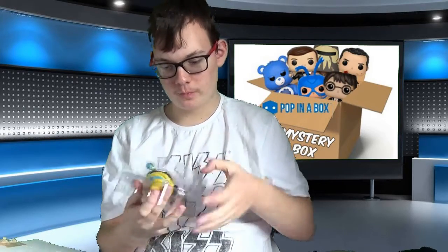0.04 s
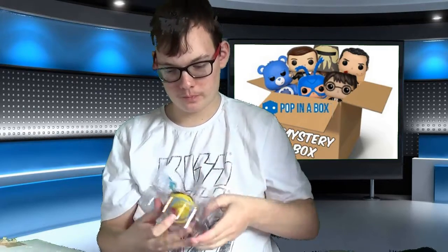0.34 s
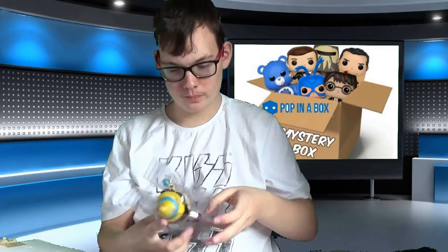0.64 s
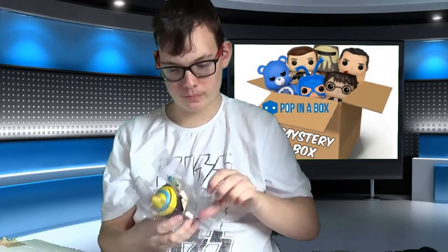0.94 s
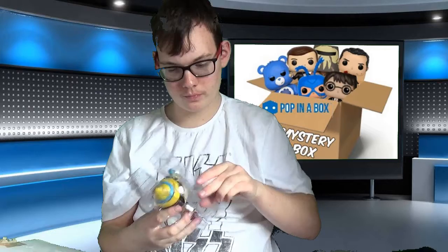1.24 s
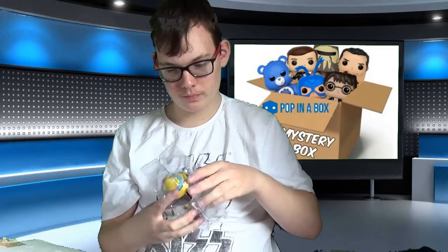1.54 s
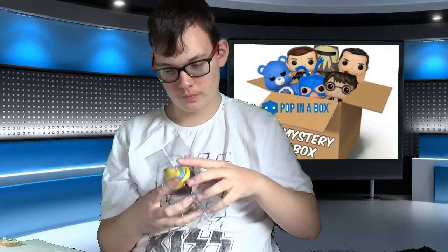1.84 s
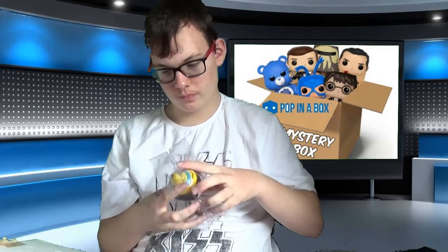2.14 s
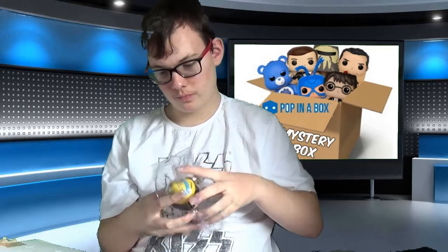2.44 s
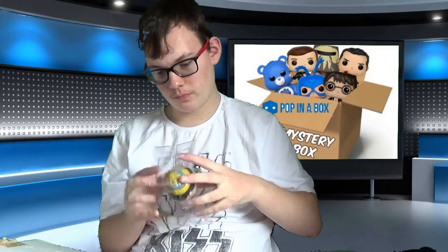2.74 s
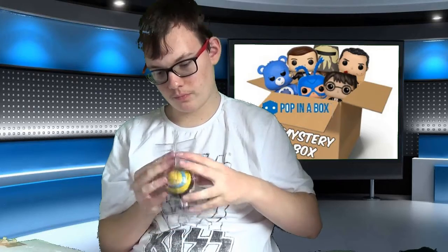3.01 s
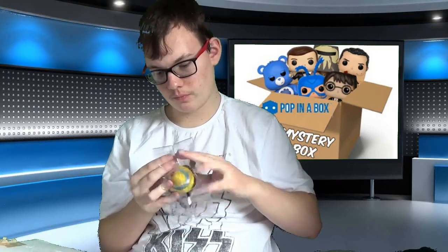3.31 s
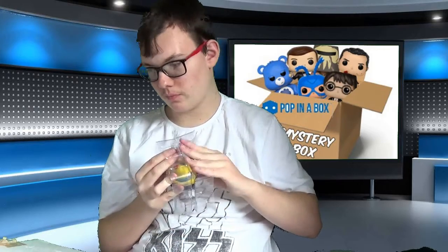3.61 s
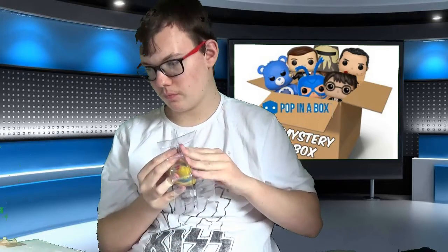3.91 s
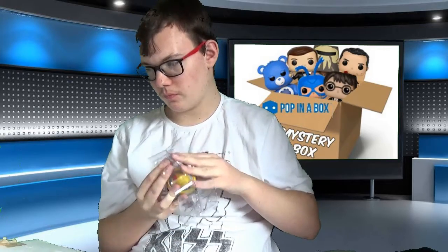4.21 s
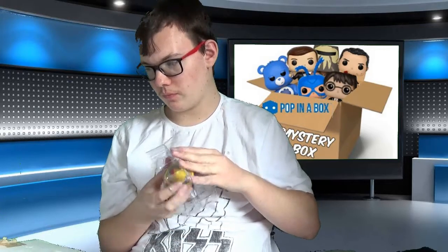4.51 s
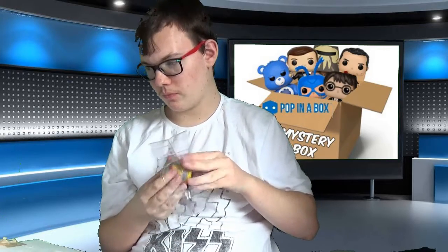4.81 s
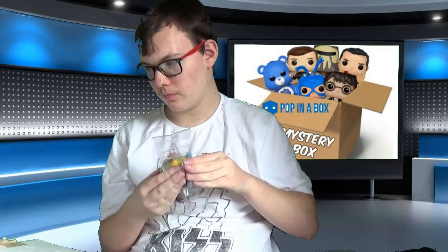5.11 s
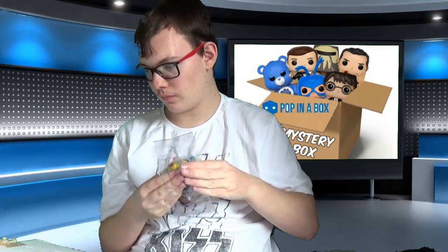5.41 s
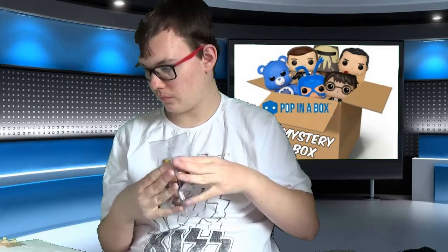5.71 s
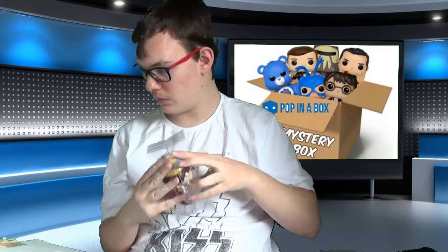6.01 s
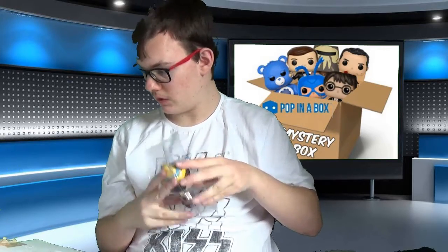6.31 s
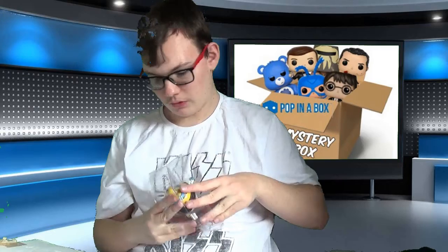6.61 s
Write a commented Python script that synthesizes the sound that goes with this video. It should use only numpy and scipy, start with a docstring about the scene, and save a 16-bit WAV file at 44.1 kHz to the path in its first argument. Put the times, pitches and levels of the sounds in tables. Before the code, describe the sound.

Hands press a hard figure into a thin plastic tray, which buckles with sharp, irregular snaps and clicks amid faint rubbing and crinkling. The crackling is busiest in the first half, then thins out before one loud cluster of cracks and a few lighter clicks. It is close to a desk microphone in a small room with a low hum.

```python
"""Sharp plastic snaps scattered throughout, amid faint rubbing and crinkling, over a low room hum.
Hands press a hard figure into a blister tray, close to a desk microphone in a small room. Each panel
that buckles cracks at its crease, rings for a few cycles and pushes the air in the hollow. Stick-slip
makes the rub and crinkle, which swell with each grip. Three times the figure bumps the tray wall."""
import sys
import numpy as np
from scipy import signal
from scipy.fft import rfft, irfft, next_fast_len
from scipy.io import wavfile
from scipy.ndimage import map_coordinates

SR = 44100
rng = np.random.default_rng(int(sys.argv[2]) if len(sys.argv) > 2 else 0)


def store_wav(level_fs):
    """Save 16-bit WAV to argv[1]."""
    pcm = np.round(np.clip(np.atleast_2d(level_fs), -1, 1) * 32767)
    wavfile.write(sys.argv[1], SR, pcm.T.astype(np.int16))


N = 297675
PANEL_HZ = 1750  # mid-sized panel


def amp(db):
    """Decibels to gain."""
    return 10 ** (np.asarray(db) / 20)


def unit_rms(x):
    """Scale to rms 1."""
    return x / np.sqrt(np.mean(x ** 2) + 1e-20)


def unit_energy(x):
    """Scale each row to energy 1."""
    return x / np.sqrt(np.sum(x ** 2, axis=-1, keepdims=True) + 1e-20)


def along(points, hz):
    """Interpolate (freq_hz, value) points on a log frequency axis."""
    point_hz, values = np.transpose(points)
    return np.interp(np.log(hz + 1), np.log(point_hz), values)


def decay(t, t60_s):
    """Envelope losing 60 dB in t60_s."""
    return np.exp(-np.log(1000) * t / t60_s)


def wobble(rate_hz):
    """Smooth random curve, rate_hz knots a second."""
    knots = rng.standard_normal(int(N * rate_hz / SR) + 4)
    return map_coordinates(knots, [np.arange(N) * rate_hz / SR])


def filtered(x, response):
    """Apply a complex frequency response to each row."""
    n = x.shape[-1]
    size = 2 * next_fast_len(n // 2 + 1024)
    return irfft(rfft(x, size) * response(np.fft.rfftfreq(size, 1 / SR)), size)[..., :n]


def coloured(x, spectrum):
    """Minimum-phase filter from (freq_hz, gain_db) points: no pre-ringing."""
    def response(hz):
        cepstrum = irfft(np.log(amp(along(spectrum, hz))))
        cepstrum[1:len(hz) - 1] *= 2
        cepstrum[len(hz):] = 0
        return np.exp(rfft(cepstrum))
    return filtered(x, response)


def room_tone(level_db, side_db):
    """Steady low room hum under faint hiss."""
    # background spectrum: freq_hz, gain_db
    air = [(15, -37), (28, -4), (40, -13), (52, 8), (66, -6), (100, -4.5), (135, -8), (200, -1.5),
           (550, -9.5), (1300, -14), (3300, -12.5), (4200, -16), (9200, -17.5), (11000, -23)]
    mid, side = unit_rms(coloured(rng.standard_normal((2, N)), air))
    side = amp(side_db) * side
    return amp(level_db) * np.array([mid + side, mid - side])


def tray_ring(count, t, spread_db=4):
    """Tray modes, excited differently at each of count contact points."""
    # modes of the tray with the figure in it: freq_hz, level_db, t60_s
    tray = [(172, -10, .1), (320, -6, .06), (510, 0, .085), (742, -2, .09), (1090, -4, .07),
            (1256, -1, .09), (1465, -3, .08), (1690, -4, .08), (2080, 0, .08), (2420, 1, .09),
            (2560, 0, .09), (3888, -8, .07)]
    hz, level_db, t60_s = np.transpose(tray)[:, :, None]
    modes = amp(level_db) * decay(t, t60_s) * np.exp(2j * np.pi * hz * t)
    shape = (count, len(tray))
    weights = amp(spread_db * rng.standard_normal(shape)) * np.exp(2j * np.pi * rng.random(shape))
    return unit_energy((weights @ modes).real)


def tray_and_room(count, tray_db, build_s):
    """Stereo impulse responses for count hand positions: tray ring plus desk and wall reflections."""
    # room decay: freq_hz, t60_s
    room_t60 = [(150, 0.26), (530, 0.1463), (1400, 0.0841), (3700, 0.1127), (10000, 0.0633)]
    # reflection spectrum: freq_hz, gain_db
    room_colour = [(100, -13), (500, -1), (1250, 2.5), (2400, -1.5), (3200, -1.5), (6000, -2.5), (10000, 0)]
    # stereo width of the reflections: freq_hz, side_gain_db
    width = [(100, -11), (500, -9), (1200, -6.5), (4000, -6.5), (9000, -12.5)]
    t = np.arange(SR // 4) / SR
    hz, frame_s, noise = signal.stft(rng.standard_normal((2, count, len(t))), SR, nperseg=256)
    damped = noise * decay(frame_s, along(room_t60, hz)[:, None])
    tails = signal.istft(damped, SR, nperseg=256)[1][..., :len(t)]
    mid, side = coloured(unit_energy(tails * (1 - np.exp(-t / build_s))), room_colour)
    mid = mid + amp(tray_db) * tray_ring(count, t)
    side = coloured(side, width)
    return np.stack([mid + side, mid - side], axis=1)


def finger_pressure(attack_s, release_s):
    """Rub and crinkle level curves in dB: each grip swells, holds and relaxes to a light hold."""
    # finger pushes and shifts: start_s, hold_s, rub_db, crinkle_db
    grips = [(0.383, 0.075, -61, -55.5), (0.56, 0.1, -60, -55.5), (0.719, 0.11, -48, -50.5),
             (0.886, .06, -53, -61), (1.184, 0.026, -54, -54.5), (1.32, 0.28, -50.5, -54.5),
             (1.694, 0.065, -62, -64.5), (2.005, 0.099, -50, -68.5), (2.201, 0.098, -55.5, -70.5),
             (2.5, 0.089, -55, -64), (2.729, 0.38, -52, -56), (3.22, 0.16, -65, -61.5),
             (3.732, 0.19, -56.5, -64.5), (3.953, 0.16, -49.5, -59), (4.365, 0.064, -52.5, -61.5),
             (4.557, 0.17, -61, -63), (4.876, 0.11, -69.5, -79), (5.392, 0.15, -55, -64.5),
             (5.773, 0.17, -62, -78), (6.054, 0.24, -58, -69), (6.378, 0.093, -52, -66),
             (6.724, .05, -56.5, -59)]
    start_s, hold_s, rub_db, crinkle_db = np.transpose(grips)[:, :, None]
    t = np.arange(0, N / SR, .002)
    swell = np.exp(-np.maximum(start_s - t, 0) / attack_s)
    relax = np.exp(-np.maximum(t - start_s - hold_s, 0) / release_s)

    def level_db(grip_db, held_db):
        power = np.sum((amp(grip_db) * swell * relax) ** 2, axis=0) + amp(held_db) ** 2
        return np.interp(np.arange(N) / SR, t, 10 * np.log10(power))

    return level_db(rub_db, held_db=-69), level_db(crinkle_db, held_db=-75.5)


def slips(spectrum, responses, rate_hz, spread_db, direct_db):
    """Tiny stick-slip releases of random time and size; rms 1."""
    sizes = amp(spread_db * np.clip(rng.standard_normal(N), -2, 2)) * rng.choice([-1, 1], N)
    grains = sizes * (rng.random(N) < rate_hz / SR)
    direct = amp(direct_db) * signal.unit_impulse(responses.shape[-1])
    paths = coloured(responses + direct, spectrum)
    out = np.zeros((2, N + SR))
    step = SR // 10  # the path changes as the hands turn
    for k, start in enumerate(range(0, N, step)):
        piece = signal.fftconvolve(grains[None, start:start + step], paths[k % len(paths)], axes=1)
        out[:, start:start + piece.shape[1]] += piece
    return unit_rms(out[:, :N])


def rub_and_crinkle(responses, rub_db, crinkle_db):
    """The figure rubs dully along the tray; fingers raise a fine, bright crinkle."""
    # figure sliding on plastic: freq_hz, gain_db
    rub_colour = [(30, -33), (90, 2), (250, -6), (480, 0.5), (850, -0.5), (1250, 2), (1800, -3.5),
                  (2400, -6.5), (3000, -8), (6000, -19), (11000, -27)]
    # sheet under the fingers: freq_hz, gain_db
    crinkle_colour = [(500, -13), (2000, -0.5), (4000, -6), (6500, 0), (9000, 3.5), (10300, -0.5),
                      (11500, -8)]
    # finest slips of a hard pinch: freq_hz, gain_db
    sizzle_colour = [(2000, -33), (5000, -6), (7500, -5), (10000, -4.5), (11500, 1)]
    grip = wobble(rate_hz=35)
    rub = slips(rub_colour, responses, rate_hz=240, spread_db=6.5, direct_db=-4.5)
    crinkle = slips(crinkle_colour, responses, rate_hz=630, spread_db=5.5, direct_db=-7)
    sizzle = slips(sizzle_colour, responses, rate_hz=2000, spread_db=7, direct_db=20)
    sizzle_db = 1.48 * crinkle_db + 11.5  # harder press, brighter crinkle
    return (amp(rub_db + 1.7 * grip) * rub
            + amp(crinkle_db + 0.41 * grip) * crinkle
            + amp(sizzle_db + 1.4 * grip) * sizzle)


def faint_buckles(rub_db, crinkle_db, rate_hz, spread_db, spread_octaves):
    """Rows for snaps(): small buckles at jittered times, as strong as the fingers press."""
    count = int(rate_hz * N / SR)
    at = ((np.arange(1, count + 1) + rng.random(count)) * N / (count + 1)).astype(int)
    size, sharpness, detune = np.clip(rng.standard_normal((count, 3)), -2, 2).T
    body_db = rub_db[at] + spread_db * size
    ring_db, knock_db = body_db + 26, body_db + 18.5
    crack_db = crinkle_db[at] + 30.5 + spread_db * (size + sharpness / 2)
    pitch_hz = PANEL_HZ * 2 ** (spread_octaves * detune)
    return np.column_stack([at / SR, ring_db, pitch_hz, crack_db, knock_db])


def panel_ring(pitch_hz, t):
    """A flipped panel rings for a few cycles; rows of energy 1."""
    # panel modes: pitch_ratio, level_db, t60_s
    panel = [(.64, -7, 0.0089), (1, 6, 0.0059), (1.24, 0, 0.0062)]
    # radiation efficiency of small panels: freq_hz, gain_db
    radiation = [(100, -27.5), (450, -11), (900, -1), (1250, 2), (1800, 1), (2150, 3.5), (2500, 3),
                 (2850, -1), (4000, 3), (9000, -26.5)]
    detune = 1 + .05 * rng.standard_normal((len(pitch_hz), len(panel)))
    modes = sum(amp(db) * decay(t, t60_s) * np.sin(2 * np.pi * pitch_hz * ratio * detune[:, [k]] * t)
                for k, (ratio, db, t60_s) in enumerate(panel))
    return unit_energy(coloured(modes, radiation))


def crease_crack(pitch_hz, t, pitch_ratio=3.003, spread_octaves=.4, zing_db=-6):
    """The stiff fold cracks and zings briefly above the panel's pitch; rows of energy 1."""
    # crack spectrum: freq_hz, gain_db
    crack_colour = [(300, -31), (1500, -20.5), (3000, 0.5), (4000, 2.5), (6000, 3), (9500, 1.5),
                    (11500, -13.5)]
    octaves = spread_octaves * rng.uniform(-2.02, 2.01, pitch_hz.shape)
    zing_hz = pitch_ratio * pitch_hz * 2 ** octaves
    zing = amp(zing_db) * unit_energy(np.cos(2 * np.pi * zing_hz * t) * decay(t, t60_s=0.0048))
    return unit_energy(coloured(signal.unit_impulse(len(t)) + zing, crack_colour))


def hollow_knock(t):
    """The panel pushes the air in the hollow; energy 1."""
    # spectrum of the hollow: freq_hz, gain_db
    knock_colour = [(30, -31), (70, -4), (115, -11), (170, 1.5), (260, -7), (350, 4), (500, 3.5), (750, 6),
                    (1000, -5), (1400, 5.5), (3000, -56)]
    return unit_energy(coloured(signal.unit_impulse(len(t)), knock_colour))


def giving_way(give_s, rate_hz):
    """A crease lets go in tiny slips around one main jump; one row per snap."""
    t = np.arange(-(SR // 200), SR // 200 + 1) / SR
    shape = (len(give_s), len(t))
    tiny_slips = 0.85 * rng.standard_normal(shape) * (rng.random(shape) < rate_hz / SR)
    distance = np.where(t < 0, -2 * t, t)  # builds twice as fast as it fades
    return (t == 0) + tiny_slips * np.exp(-distance / np.maximum(give_s, 1 / SR))


def snaps(buckles, responses):
    """Buckling panels: ring, crack and knock, heard directly and through tray and room."""
    start_s, ring_db, pitch_hz, crack_db, knock_db = np.transpose(buckles)[:, :, None]
    # smaller, higher panels give way sooner and sound drier; hard flips are drier too
    octaves = np.log2(pitch_hz / PANEL_HZ)
    give_s = 0.00046 * .5 ** (1.9 * octaves)
    typical_ring_db = -19.5
    send_db = -1 - 3.5 * octaves - 0.1557 * (ring_db - typical_ring_db)
    t = np.arange(SR // 25) / SR
    ring = amp(ring_db) * panel_ring(pitch_hz, t)
    crack = amp(crack_db) * crease_crack(pitch_hz, t)
    knock = amp(knock_db) * hollow_knock(t)
    release = giving_way(give_s, rate_hz=5000)

    def direct(part, shiver_db, t60_s):
        """Spread a part over the slips and the sheet's brief shiver, at unchanged energy."""
        shiver = amp(shiver_db) * unit_energy(rng.standard_normal(part.shape) * decay(t, t60_s))
        drive = signal.fftconvolve(release, signal.unit_impulse(len(t)) + shiver, axes=1)
        spread = signal.fftconvolve(part, drive, axes=1)
        return unit_energy(spread) * np.linalg.norm(part, axis=1, keepdims=True)

    near = (direct(ring, shiver_db=-7, t60_s=0.036)
            + direct(crack, shiver_db=4, t60_s=0.011)
            + direct(knock, shiver_db=5.5, t60_s=0.071))
    out = np.zeros((2, N + SR))
    for k, hit in enumerate(ring + crack + knock):
        start = round(start_s[k, 0] * SR)
        early = start - release.shape[1] // 2
        out[:, early:early + near.shape[1]] += near[k]
        echo = amp(send_db[k]) * signal.fftconvolve(hit[None], responses[k % len(responses)], axes=1)
        out[:, start:start + echo.shape[1]] += echo
    return out[:, :N]


def bumps(responses, send_db, rise_s, t60_s):
    """The figure bumps the tray wall: a few low cycles, no crack."""
    # soft contacts: start_s, energy_db, pitch_hz
    contacts = [(2.174, -25.5, 435), (2.321, -26, 402), (4.068, -15, 372)]
    t = np.arange(SR // 25) / SR
    envelope = decay(t, t60_s) * (1 - np.exp(-t / rise_s))
    out = np.zeros((2, N + SR))
    for k, (start_s, energy_db, pitch_hz) in enumerate(contacts):
        thud = amp(energy_db) * unit_energy(np.sin(2 * np.pi * pitch_hz * t) * envelope)
        path = amp(send_db) * responses[k] + signal.unit_impulse(responses.shape[-1])
        heard = signal.fftconvolve(thud[None], path, axes=1)
        start = round(start_s * SR)
        out[:, start:start + heard.shape[1]] += heard
    return out[:, :N]


def scene():
    """All contacts share one tray and room; finger pressure drives the small sounds."""
    # panel flips at set times, from faint ticks to the big pop (levels are energies): start_s, ring_db,
    # pitch_hz, crack_db, knock_db
    placed_buckles = [(0.390, -23.5, 1870, -28, -31), (0.419, -25, 1730, -19, -28.5),
                      (0.551, -28.5, 1550, -26.5, -27), (0.649, -17, 2700, -10, -16.5),
                      (0.707, -13, 1860, -10, -39), (0.719, -13, 1920, -6.5, -18),
                      (0.731, -27, 2290, -8.5, -41), (0.800, -13.5, 1940, -19.5, -18.5),
                      (0.806, -14.5, 2270, -9.5, -15.5), (0.904, -27, 2040, -15, -24),
                      (1.102, -10, 1460, -15.5, -12.5), (1.170, -9.5, 2030, -11.5, -20),
                      (1.216, -29, 1610, -23, -27.5), (1.282, -12, 1900, -16, -31),
                      (1.305, -11.5, 1100, -16.5, -14), (1.355, -10.5, 1670, -2.5, -11),
                      (1.366, -5, 2340, -23, -29), (1.384, -16, 2230, -15, -20),
                      (1.418, -17.5, 1760, -11, -26), (1.438, -8, 1460, -14, -16.5),
                      (1.498, -12.5, 1920, -15, -15), (1.508, -12, 2000, -15, -22),
                      (1.541, -11.5, 1580, -16.5, -21), (1.567, -26, 1670, -19, -36),
                      (1.6007, -2.5, 2060, -8, -17.5), (1.686, -23, 1140, -23, -34),
                      (1.707, -16, 2290, -17, -33), (1.796, -18.5, 1740, -25.5, -37),
                      (1.936, -28.5, 1850, -29, -48), (1.965, -26.5, 1210, -42, -40),
                      (2.009, -21.5, 2350, -28.5, -36), (2.062, -18, 1200, -30, -25.5),
                      (2.107, -16, 1230, -34, -20), (2.237, -14.5, 1270, -26, -22),
                      (2.258, -15.5, 2050, -42, -54), (2.431, -28, 1320, -31, -52),
                      (2.472, -10.5, 2340, -20.5, -42), (2.485, -12, 2060, -23, -23),
                      (2.512, -13, 1410, -27, -18.5), (2.547, -38, 1800, -31.5, -36),
                      (2.59, -28, 1750, -34.5, -34), (2.6581, -14, 1360, -24, -24),
                      (2.727, -14.5, 2240, -13.5, -24.5), (2.739, -20, 2190, -18, -29),
                      (2.766, -8.5, 2050, -10.5, -21.5), (2.822, -20, 1640, -21, -20.5),
                      (2.880, -25, 2190, -32, -31), (2.904, -14.5, 2300, -12, -21),
                      (3.0176, -5, 2130, -11, -29), (3.066, -14, 2360, -7.5, -29),
                      (3.242, -21.5, 1870, -22, -34), (3.287, -18, 1620, -16.5, -27),
                      (3.3846, -8, 1320, -18, -23), (3.391, -19, 1780, -15, -22),
                      (3.418, -19.5, 2200, -16, -30), (3.432, -27, 1890, -24.5, -36),
                      (3.607, -34, 2150, -31.5, -35), (3.7804, -20.5, 2400, -22, -36),
                      (3.924, -20.5, 1670, -20.5, -39), (3.965, -24, 1470, -22.5, -34),
                      (4.067, -13, 990, -15, -29), (4.092, -17.5, 2160, -29, -31),
                      (4.271, -22, 1840, -20, -31), (4.371, -16.5, 1410, -15, -32),
                      (4.405, -24.5, 1840, -21.5, -37), (4.8251, -25, 1170, -36, -47),
                      (4.911, -30.5, 1640, -25.5, -31), (4.980, -34, 2420, -29.5, -39),
                      (5.048, -29, 1980, -34, -32), (5.072, -28, 1400, -31.5, -29),
                      (5.367, -21.5, 1680, -24, -24), (5.422, -19.5, 1720, -16, -46),
                      (5.4927, 3, 2450, -10.5, -8.5), (5.4929, 0, 1300, -11, -5),
                      (5.497, -4.5, 2100, -9, -8.5), (5.500, -5, 2170, -20, -9),
                      (5.505, -8.5, 1520, -17, -17.5), (5.732, -17, 2000, -15.5, -32),
                      (5.738, -21, 1750, -15, -20.5), (5.826, -22, 1620, -40, -32),
                      (5.881, -21.5, 1780, -33, -25.5), (6.053, -21.5, 1680, -34, -24.5),
                      (6.095, -20, 1900, -31, -29), (6.1113, -19.5, 2300, -12, -24.5),
                      (6.182, -15, 2230, -18, -32), (6.253, -23.5, 2150, -18, -29.5),
                      (6.370, -18.5, 2000, -21.5, -24.5), (6.457, -19, 1660, -38, -31),
                      (6.471, -21.5, 1550, -30.5, -29.5), (6.5578, -25, 1860, -27, -27),
                      (6.738, -21, 2300, -21.5, -43)]
    responses = amp(-1.5) * tray_and_room(count=24, tray_db=-10.5, build_s=0.0039)
    rub_db, crinkle_db = finger_pressure(attack_s=0.027, release_s=0.038)
    hits = snaps(placed_buckles, responses)
    ticks = faint_buckles(rub_db, crinkle_db, rate_hz=22, spread_db=4.5, spread_octaves=0.28)
    hits += snaps(ticks, responses)
    hits += bumps(responses, send_db=-5, rise_s=0.0015, t60_s=0.02)
    handling = rub_and_crinkle(responses[:8], rub_db, crinkle_db)
    return hits + handling + room_tone(level_db=-64.5, side_db=-14)


def record(dry):
    """Two close capsules, hands slightly to the left; steep low-pass."""
    # phase between capsules: freq_hz, left_lead_rad
    lead = [(100, .05), (700, .17), (1500, .45), (2600, .33), (3800, .08), (11000, .03)]
    # balance between capsules: freq_hz, left_minus_right_db
    lean = [(100, 0), (800, 0), (1300, 1.1), (2300, 0.92), (3500, 0), (6500, 1.2), (10000, 0)]
    cutoff_hz = 11130
    half = np.array([[.5], [-.5]])
    pair = filtered(dry, lambda hz: amp(half * along(lean, hz)) * np.exp(1j * half * along(lead, hz)))
    return filtered(pair, lambda hz: 1 / np.sqrt(1 + (hz / cutoff_hz) ** 220))


dry = scene()
out = record(dry)
store_wav(out)
```